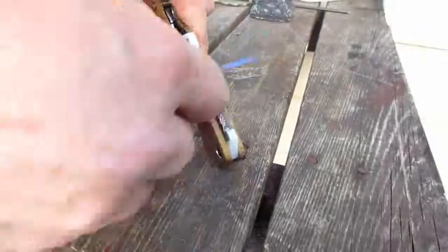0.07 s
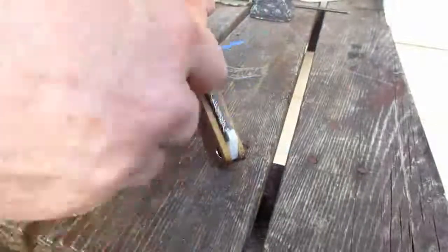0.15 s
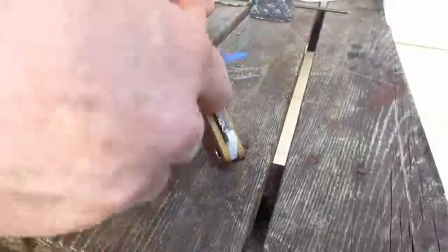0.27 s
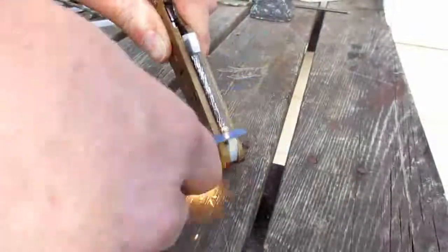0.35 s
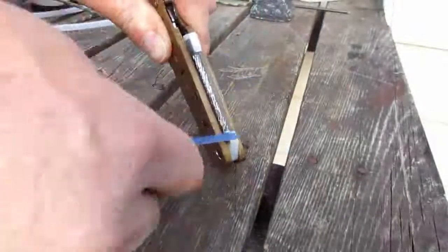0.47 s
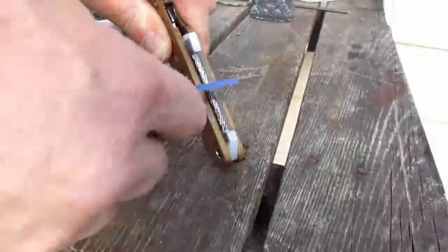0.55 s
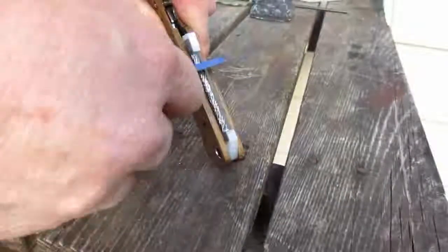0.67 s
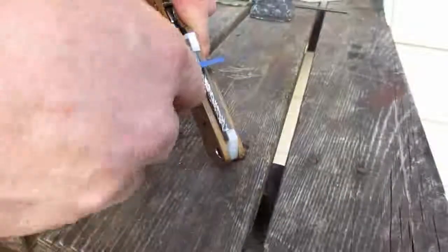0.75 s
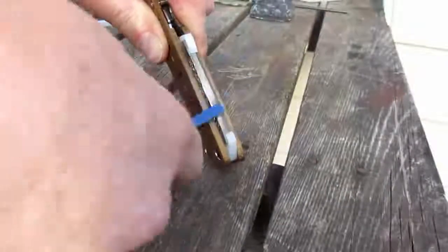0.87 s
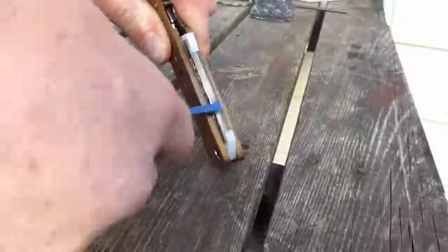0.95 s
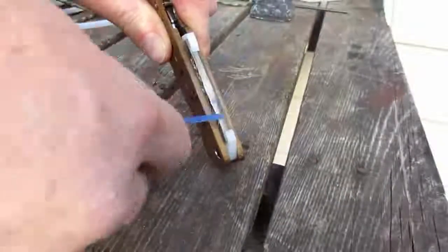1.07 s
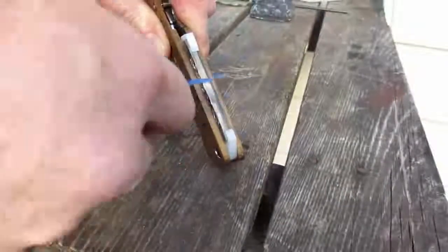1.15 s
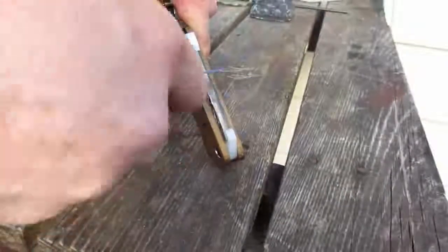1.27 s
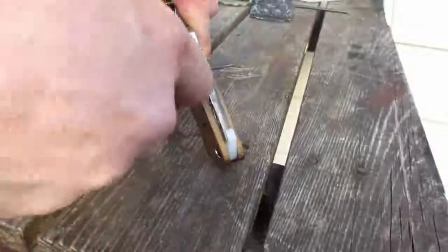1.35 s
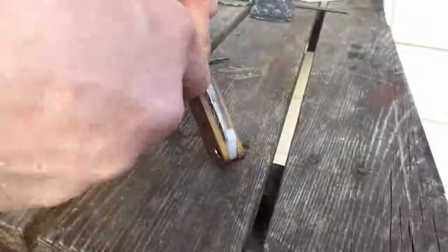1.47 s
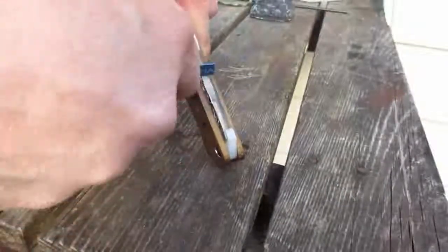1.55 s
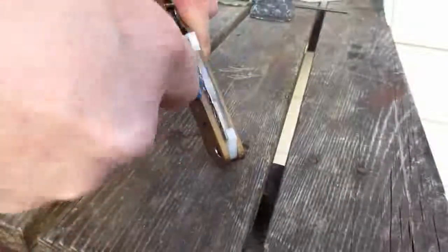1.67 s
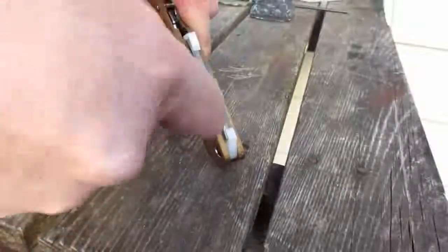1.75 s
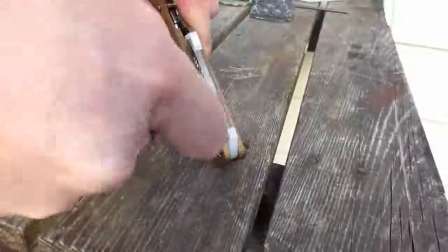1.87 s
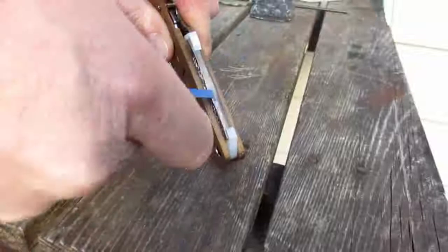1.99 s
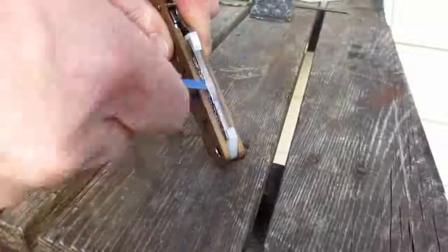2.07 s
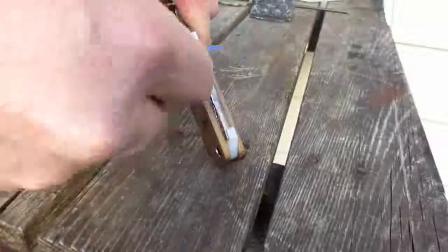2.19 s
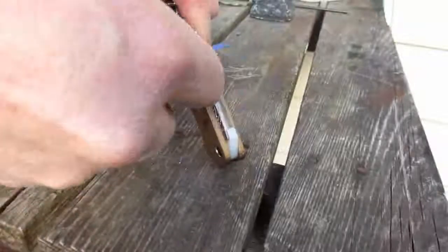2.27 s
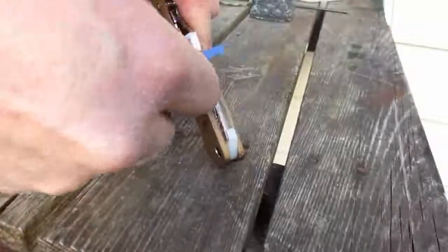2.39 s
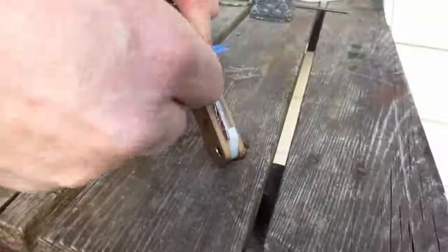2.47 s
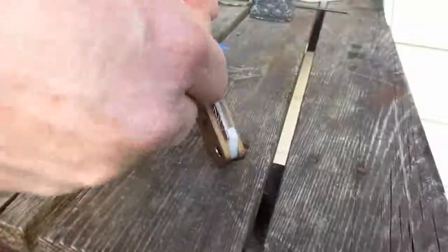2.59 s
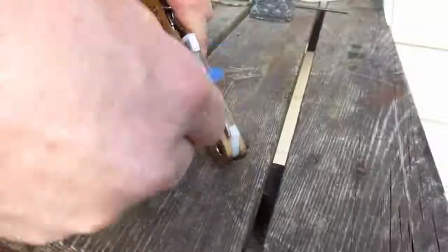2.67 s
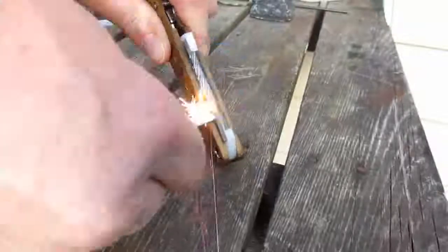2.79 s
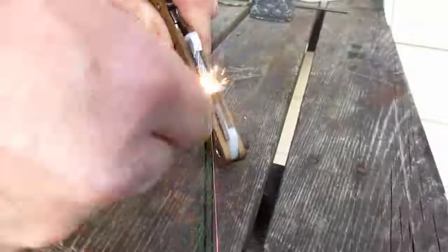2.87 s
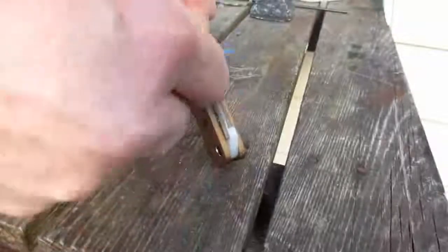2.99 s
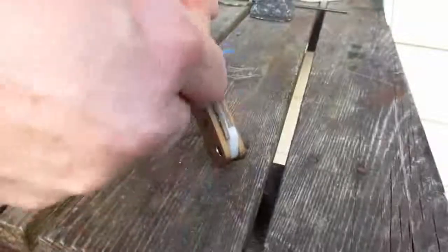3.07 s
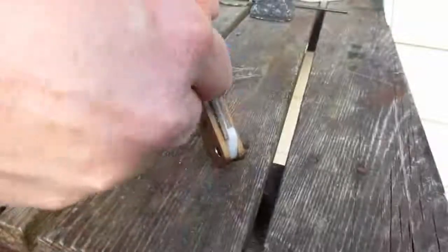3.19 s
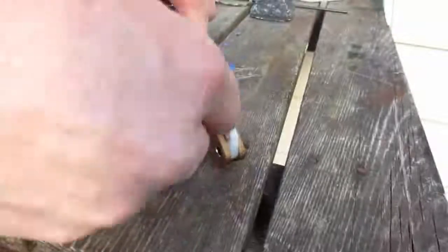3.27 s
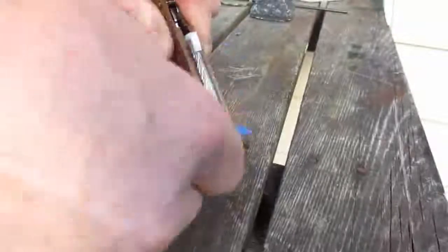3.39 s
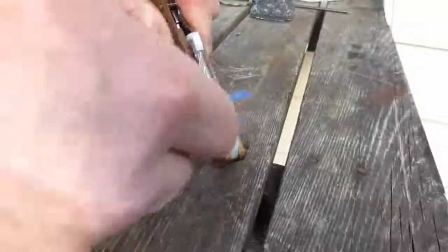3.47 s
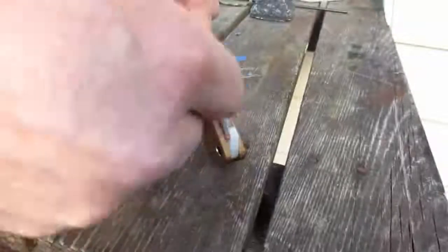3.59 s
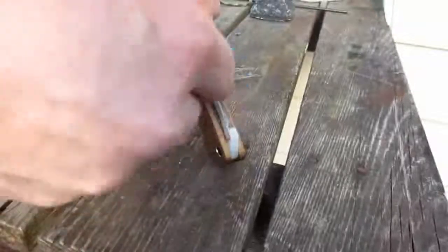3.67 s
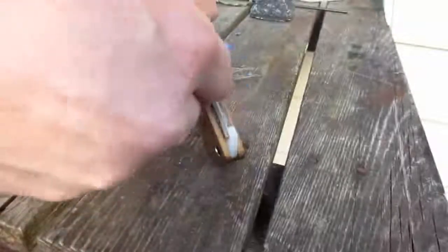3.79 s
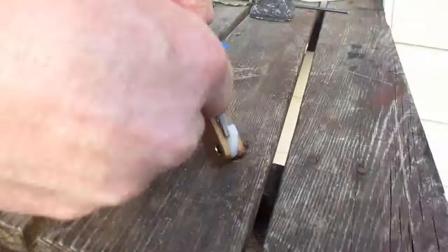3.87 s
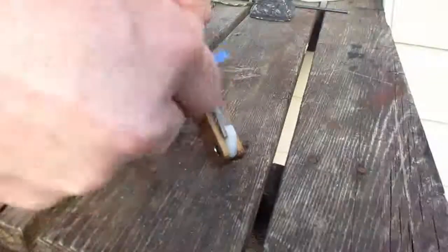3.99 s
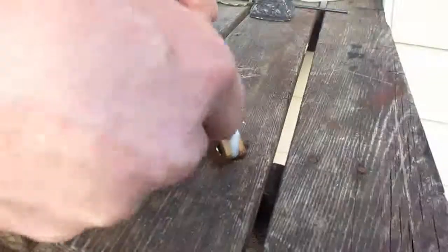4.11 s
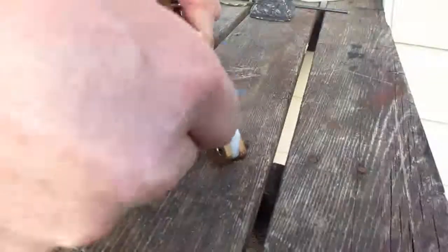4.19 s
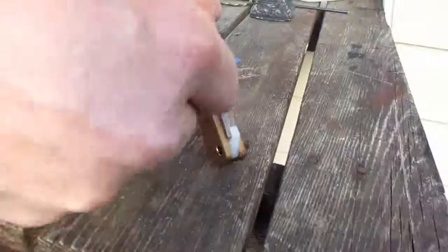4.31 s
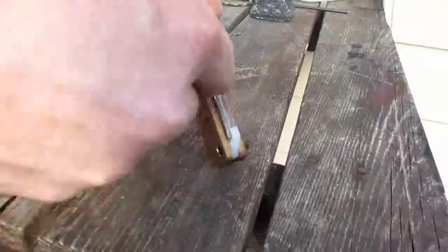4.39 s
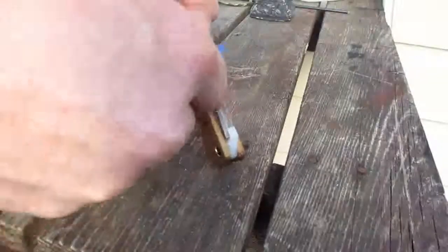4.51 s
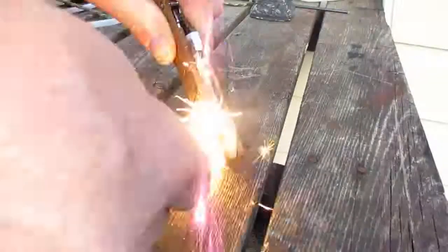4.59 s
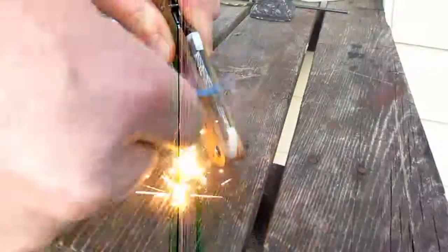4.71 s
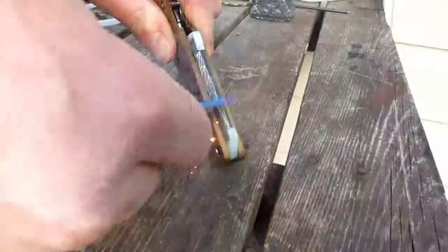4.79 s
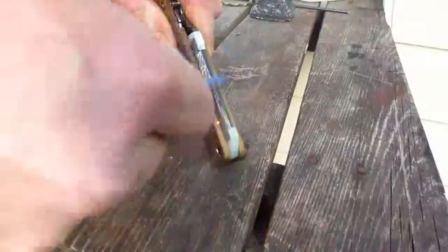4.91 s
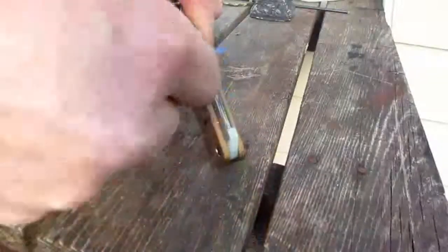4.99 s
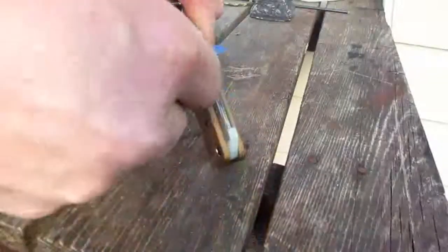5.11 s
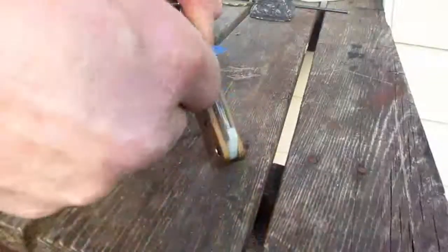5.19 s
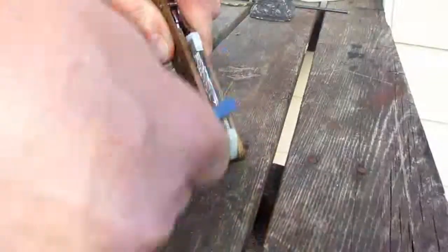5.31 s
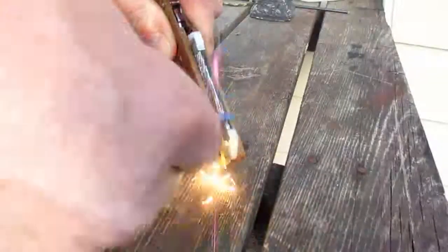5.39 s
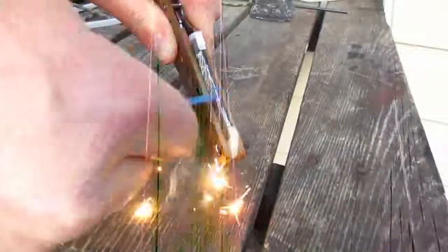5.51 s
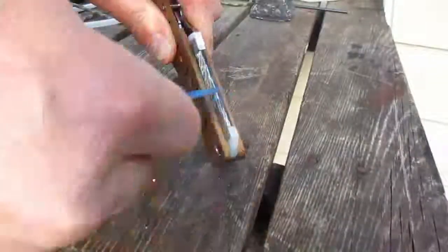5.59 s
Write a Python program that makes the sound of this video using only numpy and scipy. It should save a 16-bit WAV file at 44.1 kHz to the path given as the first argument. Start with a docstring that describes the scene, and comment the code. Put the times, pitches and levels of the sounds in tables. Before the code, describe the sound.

A metal edge catches and slips on flint: a double scratch early, one quick snap, then a sparse stretch of blade ticks and light slides. From the middle, gritty strokes return in clusters, three ending in spark crackle, the last two with loud pops. The table answers with short dull woody knocks. Near, dry, slightly muffled on top, almost centred, over quiet outdoor hum.

```python
"""At a wooden garden table outdoors, a steel striker is scraped along a flint rod held against the boards.
The edge sticks and slips: random clicks coloured as grit also excite the resonant modes of the table.
The harder strokes throw sparks: showers of clicks fizz and short pressure pulses pop.
Between strokes the blade taps (noise bursts and dying modes) and slides lightly back up the rod.
A distant motor hums as wavering sines over the wash of the air, made of shaped noise."""
import sys
import numpy as np
from scipy import signal
from scipy.fft import rfft, irfft
from scipy.io import wavfile
from scipy.ndimage import uniform_filter1d

SR = 44100
rng = np.random.default_rng(int(sys.argv[2]) if len(sys.argv) > 2 else 0)


def master_out(mix):
    """Clip the mix to full scale and print it as 16-bit PCM to the path in sys.argv[1]."""
    frames = np.transpose(np.atleast_2d(mix))
    ceiling = np.clip(frames, -1, 1)
    pcm = np.round(ceiling * 32767).astype(np.int16)
    wavfile.write(sys.argv[1], SR, pcm)


N = 249165

# Levels in the event tables are relative: each source function adds its own trim in dB.
# pushes of the edge down the rod: full_bite_s, hold_s, swell_over_hold_db, edge_bite_db, table_force_db,
# table_tilt_db_per_octave, grit_tilt_db_per_octave, rise_s, fall_s
STROKE_EVENTS = [ (0.318, 0.045, 8, -30.5, -26.5, -0.5, -2, 0.066, 0.022),
                 (0.408, 0.02, -5, -31.5, -32.5, -3, 0.5, 0.027, 0.092),
                 (0.860, 0.015, 3.5, -25, -26, -1.5, -0.95, 0.035, 0.033),
                 (2.681, 0.069, 5, -32.5, -30, -2.2, -2, 0.026, 0.039),
                 (3.294, 0.042, -1, -33.5, -33, -1, -3, 0.045, 0.057),
                 (3.399, 0.051, -11, -45.5, -30.5, -3.5, -3.5, 0.0092, 0.13),
                 (3.891, 0.045, -2.5, -43, -34, -10.5, -5.5, 0.0092, 0.051),
                 (4.028, 0.046, -3.5, -28.5, -22.5, -3, 0, 0.015, 0.045),
                 (4.592, 0.037, -1, -22, -24, -2.2, 0.8, 0.081, 0.047),
                 (5.323, 0.091, -1, -26, -26, -1.1, -0.4, 0.022, 0.0091)]
# showers of burning shavings: full_level_s, hold_s, level_db, fizz_tilt_db_per_octave
SPARK_SHOWERS = [(2.81, 0.085, -28, 0.8), (4.655, 0.091, -26.5, 0.1), (5.436, 0.064, -28, 1.5)]
# modes of the table with the holder on it: pitch_hz, width_hz, level_db
TABLE_MODES = [(103, 56, -7), (265, 31, -6.5), (363, 73, -5), (479, 53, -2), (647, 72, -5), (754, 46.3, 1),
               (885, 110, -7.5), (1007, 131, -4), (1156, 84, -0.5), (1266, 67, -7), (1511, 56, -7.5),
               (1728, 43, -9.5)]
# modes of the loosely held blade: pitch_hz, width_hz, level_db
BLADE_MODES = [(3000, 44, -16), (3750, 400, -9.5), (4850, 190, 3), (4650, 46, -5), (5060, 220, -2),
               (6600, 580, -13)]
# spectrum of the cutting edge: frequency_hz, level_db
GRIT_SPECTRUM = [(100, -21.5), (900, -0.5), (1600, 0), (2100, -7), (2500, -3.5), (3100, -1.5), (3700, -4.5),
                 (4400, -0.5), (5200, -3), (5900, -3), (6500, -4), (6950, 0.5)]
# spectrum of the sliding edge: frequency_hz, level_db
GLIDE_SPECTRUM = [(200, -11.5), (1200, 2), (2200, -1.5), (3000, 4.5), (3800, -1.5), (4900, -1), (6000, 6.5),
                  (7000, -2.5)]

EDGE_HZ = 7085  # upper limit of the sound
RING_T = np.arange(4096) / SR  # time axis of every short sound, s
FADE_DB = 30  # every gesture's rise and fall time spans this much
RISE_BEND = 1.51  # above 1 the edge catches quickly, then eases into its full bite


def amp(db):
    """Level law: 20 dB is a factor of ten in amplitude."""
    return 10 ** (np.asarray(db) / 20)


def evened(x):
    """Normalization to unit root mean square."""
    return x / np.sqrt(np.mean(x ** 2) + 1e-20)


def held(x, steady_s=0.024):
    """Short-term normalization: unit level throughout, with the fast grain kept."""
    power = abs(uniform_filter1d(x ** 2, int(steady_s * SR) + 1))
    return x / np.sqrt(power + 1e-20)


def read(points, hz):
    """Spectral interpolation: straight lines on a log-frequency axis."""
    f, value = np.transpose(points)
    return np.interp(np.log(hz + 1), np.log(f + 1), value)


def add(mix, s, sound):
    """Superposition: adds a sound to the mix from time s, in place."""
    part = mix[max(round(s * SR), 0):][:len(sound)]
    part += sound[:len(part)]


def wander(hz):
    """Slow random modulation: joined chance values of unit level, moving up to hz times a second."""
    knots = rng.standard_normal(N // 20)
    return evened(np.interp(np.arange(N) * 2 * hz / SR, np.arange(N // 20), knots))


def grains(per_s, spread_db):
    """Impulsive excitation: sparse clicks of random sign, most small and a few large."""
    size = amp(spread_db * np.minimum(rng.exponential(1, N), 4))
    return size * rng.choice([-1, 1], N) * (rng.random(N) < per_s / SR)


def colour(points, size=2048):
    """Minimum phase: the causal impulse response with the given spectrum, by folding the cepstrum."""
    cepstrum = irfft(np.log(amp(read(points, np.fft.rfftfreq(size, 1 / SR)))))
    cepstrum[1:size // 2] *= 2
    cepstrum[size // 2 + 1:] = 0
    return irfft(np.exp(rfft(cepstrum)))


def ring(modes):
    """Modal sum: a struck body answers with dying sines, here of alternating sign."""
    response = 0
    for k, (hz, width, db) in enumerate(modes):
        decay = np.exp(-np.pi * width * RING_T)  # a wider resonance dies sooner
        response = response + (-1) ** k * amp(db) * width * decay * np.sin(2 * np.pi * hz * RING_T)
    return response


def through(drive, response):
    """Source-filter principle: a drive convolved with a body's response, held at unit level."""
    return held(signal.oaconvolve(drive, response)[:N])


def control(events, axis, t):
    """Piecewise-linear control: an event column at times t, steady while held, gliding to the next."""
    rows = np.array(events)
    edges = np.column_stack([rows[:, 0], rows[:, 0] + rows[:, 1]]).ravel()
    return np.interp(t, edges, np.repeat(rows[:, axis], 2))


def mottled(x, events, axis, patchy_db, size=4):
    """Time-varying spectrum: tilted event by event, with random patches as each flake breaks differently."""
    hz, t, z = signal.stft(x, SR, nperseg=256)
    patches = uniform_filter1d(rng.standard_normal(z.shape), size, axis=0)
    patches = uniform_filter1d(patches, size, axis=1)
    octaves = np.log2(np.maximum(hz, 500) / 4000)[:, None]  # the tilt stops below 500 Hz
    tilt = octaves * control(events, axis, t)
    return held(signal.istft(z * amp(tilt + patchy_db * evened(patches)), nperseg=256)[1][:N])


def envelope(s, hold_s, swell_db, rise_s, fall_s):
    """Gesture envelope: gain rises until s, swells or sags while held, then falls away exponentially."""
    t = np.arange(N) / SR - s
    rising = (np.maximum(-t, 0) / rise_s) ** RISE_BEND
    falling = np.maximum(t - hold_s, 0) / fall_s
    return amp(swell_db * np.clip(t / hold_s, 0, 1) - FADE_DB * np.minimum(rising + falling, 10))


def background(air_db=-51.5, rumble_db=-3, waver_db=2.4, drift_turns=0.099):
    """Broadband and tonal noise: a distant motor's sines waver in level and phase over outdoor air."""
    # spectrum of the outdoor air: frequency_hz, level_db
    air_spectrum = [(12, -56), (20, -30.5), (45, -3.5), (68, -2), (81, -13), (109, -1.5), (146, -8.5),
                    (238, -3.5), (269, -12.5), (327, -17), (388, -14.5), (428, -18), (752, -18),
                    (1420, -32), (7000, -40.5), (9100, -63), (15400, -120)]
    # lines of the hum: pitch_hz, level_db (root mean square, before wavering)
    hum_lines = [(59.3, -51.5), (119.3, -50.5), (196, -59.5), (215.5, -59.5), (238.6, -51.5), (323, -61.5),
                 (357, -65)]
    t, f = np.arange(N) / SR, np.fft.rfftfreq(N, 1 / SR)
    z = rfft(rng.standard_normal(N)) * amp(read(air_spectrum, f))
    wash = z / irfft(z * ((f > 400) & (f < EDGE_HZ)), N).std()  # unit level above 400 Hz
    rumble = amp(read([(250, rumble_db), (400, 0.0023)], f))
    air = amp(air_db) * irfft(wash * rumble, N)
    hum = 0
    for hz, db in hum_lines:
        level = amp(db + waver_db * wander(4.9))
        hum = hum + level * np.sin(2 * np.pi * (hz * t + drift_turns * wander(4)))
    return air + np.sqrt(2) * hum


def surroundings(x, echo_db=-19, t60=0.1, count=160):
    """Early reflections: faint, short scatter from the hands, the table top and the wall."""
    delay = rng.uniform(0.0041, 0.086, count)  # s
    echoes = np.zeros(SR)
    echoes[(delay * SR).astype(int)] = rng.choice([-1, 1], count) * np.exp(-np.log(1000) * delay / t60)
    return x + amp(echo_db) * signal.oaconvolve(x, echoes / np.linalg.norm(echoes))[:N]


def shower_gain(flare_s=0.027, burn_db_per_s=-88.5, go_out_s=0.042):
    """Burn-down: every shower flares up, sinks at the same speed while held and goes out."""
    return sum(amp(db) * envelope(s, hold, burn_db_per_s * hold, flare_s, go_out_s)
               for s, hold, db, _ in SPARK_SHOWERS)


def sparks(fizz_db=1.0, pop_db=3, pop_s=0.000098):
    """Combustion noise: burning shavings crackle, and flint grains burst with a tiny blast wave."""
    # spectrum of the burning shavings: frequency_hz, level_db
    fizz_spectrum = [(100, -47), (170, -6.5), (255, 1), (327, -2.5), (546, -3), (757, -1.5), (844, -2.5),
                     (1070, 0), (1700, -13), (4060, -11), (4600, -11.5), (7000, -11), (9100, -39.5),
                     (15400, -120)]
    # bursting grains of flint: time_s, peak_db
    pop_events = [(2.8072, -17), (2.8155, -15), (2.897, -17), (4.6066, -2.5), (4.6578, -4), (4.6942, -13),
                  (4.8642, -18), (5.373, -12), (5.438, -2.5), (5.446, -2.5), (5.481, -10)]
    crackle = grains(5000, 2.4) * amp(2.0 * wander(150))
    fizz = mottled(through(crackle, colour(fizz_spectrum)), SPARK_SHOWERS, axis=3, patchy_db=3.5)
    out = amp(fizz_db) * shower_gain() * fizz
    u = RING_T / pop_s
    blast = (1 - u) * np.exp(-u)  # overpressure, then suction
    for s, db in pop_events:
        add(out, s + 0.001075, amp(db + pop_db) * blast)
    return out


def slide_gains(ease=0.51, fall_s=0.037):
    """Common excitation: one touch drives the edge, the table and the ring of the blade."""
    # light slides of the blade: full_level_s, hold_s, swell_over_hold_db, edge_bite_db, table_force_db,
    # blade_ring_db
    slide_events = [ (0.995, 0.029, 4, -46.5, -47, -59), (1.393, 0.0096, -13.5, -56, -34.5, -30.5),
                    (1.47, 0.063, 3.5, -57, -47.5, -53), (1.548, 0.053, -3.5, -40, -37.5, -32),
                    (3.136, 0.015, 3, -52.5, -43, -52), (3.703, 0.025, -2, -58.5, -44, -54.5),
                    (4.155, 0.022, -1.5, -49, -40, -49), (4.869, 0.032, -11.5, -43.5, -43.5, -65)]
    # the rise is a share (ease) of the hold: a long slide starts gently
    return sum(np.outer(amp(levels_db), envelope(s, hold, swell, ease * hold, fall_s))
               for s, hold, swell, *levels_db in slide_events)


def sliding(grit_db=4, blade_db=-4.5, table_db=-2, light_hz=800):
    """Light friction: the blade is free to ring, and mainly the upper table modes answer."""
    bumps = grains(5000, 3.3) * amp(1.4 * wander(180))
    upper = signal.sosfilt(signal.butter(2, light_hz, "high", fs=SR, output="sos"), ring(TABLE_MODES))
    bite, force, ringing = slide_gains()
    edge = amp(grit_db) * bite * through(bumps, colour(GLIDE_SPECTRUM))
    wood = amp(table_db) * force * through(bumps, upper)
    blade = amp(blade_db) * ringing * through(bumps, ring(BLADE_MODES))
    return edge + wood + blade


def taps(knock_db=2, blade_db=-2, scuff_db=-7, crack_s=0.0012, scuff_s=0.0089, rise_s=0.0047,
         focus_db=11, focus_octaves=0.51, damping=0.75, give_s=0.00042):
    """Impact excitation: a contact cracks, rings the blade and scuffs; its place picks the table modes."""
    # the blade lands on the rod or snags in it: time_s, crack_db, crack_tilt_db_per_octave, table_knock_db,
    # blade_ring_db, table_focus_hz
    tap_events = [ (0.170, -31.5, 0, -27, -32, 1040), (0.2933, -41, -7, -26, -41, 1090),
                  (0.3302, -16, 0.5, -16.5, -23, 760), (0.3556, -21, -1, -14.5, -33, 1100),
                  (0.3671, -7.5, 5, -16.5, -44, 750), (0.4558, -24, -4, -22, -43, 1060),
                  (0.6563, -30, 1, -33, -26, 940), (0.809, -38, -5, -36.5, -51, 696),
                  (0.8729, -10.5, 1, -28, -26, 751), (1.0182, -25.5, -1, -38, -42, 787),
                  (1.3028, -37.5, -2, -49, -68, 740), (1.3446, -22, 5.5, -51, -64, 1110),
                  (1.5704, -31, -7, -35, -16.5, 1100), (1.842, -18, 1, -38, -11.5, 1330),
                  (2.2795, -31, 1, -31, -41, 910), (2.4214, -15.5, -2, -19, -45.5, 780),
                  (2.7058, -17, 5, -18, -36, 820), (2.7427, -7, -2, -22, -47, 1200),
                  (2.8046, -13, 4.5, -23.5, -21, 800), (2.8814, -15, -1, -30, -22, 910),
                  (3.0827, -30.5, 1, -42, -36, 1090), (3.2650, -32, -4, -31, -57, 740),
                  (3.4034, -23.5, -5, -26, -45, 738), (3.4356, -31.5, -5, -30, -32, 760),
                  (3.8935, -24, 1, -28, -42, 740), (3.916, -24, -0.5, -26, -42.5, 403),
                  (3.9310, -26, -1, -25, -41, 470), (4.0194, -29.5, 5, -30, -37, 1150),
                  (4.0359, -11, 1.5, -21, -29, 760), (4.0897, -13, 12, -29, -19, 762),
                  (4.4134, -31, -3, -33, -57, 950), (4.5438, -23, -1, -29.5, -23.5, 755),
                  (4.5917, -3, -1.5, -18.5, -30, 794), (4.6580, -14.5, -6, -21, -30, 800),
                  (4.6725, -12.5, -3, -38, -39, 905), (4.7535, -16.5, -3.5, -27.5, -27, 1000),
                  (5.0534, -42, 3, -34, -65, 970), (5.1070, -14, 11, -29, -30, 690),
                  (5.3320, -13.5, -7, -19.5, -38, 570), (5.5635, -29, 4, -45, -61, 930)]
    out = np.zeros(N)
    size = len(RING_T)
    blade = ring(BLADE_MODES) * (1 - np.exp(-RING_T / give_s))  # the fingers give, softening the start
    soft = signal.butter(4, EDGE_HZ, fs=SR, output="sos")
    noises = rng.standard_normal((len(tap_events), 3, size))
    for (s, crack, tilt, knock, steel, hz), noise in zip(tap_events, noises):
        grit = colour([(f, db + tilt * np.log2(f / hz)) for f, db in GRIT_SPECTRUM])
        burst = noise[0] * np.exp(-RING_T / crack_s)  # steel on flint is a very short contact
        snap = signal.fftconvolve(burst, grit)[:size]
        settling = noise[1] * noise[2] ** 2 * np.exp(-RING_T / scuff_s)
        scuff = signal.fftconvolve(settling, colour(GLIDE_SPECTRUM))[:size]
        # modes near the focus pitch are favoured
        wood = ring([(f, damping * width, db + focus_db * np.exp(-(np.log2(f / hz) / focus_octaves) ** 2))
                     for f, width, db in TABLE_MODES])
        wood = wood * (1 - np.exp(-RING_T / rise_s)) ** 2  # the blow takes a moment to spread
        parts = [(signal.sosfilt(soft, snap), crack), (signal.sosfilt(soft, scuff), crack + scuff_db),
                 (wood, knock + knock_db), (blade, steel + blade_db)]
        for sound, db in parts:
            add(out, s + .0006, amp(db) * sound / abs(sound).max())
    return out


def stroke_gains(table_linger=1.7):
    """Common excitation: one push drives edge and table; the boards take longer to fall quiet."""
    bite = force = 0
    for s, hold, swell, bite_db, force_db, _, _, rise, fall in STROKE_EVENTS:
        bite = bite + amp(bite_db) * envelope(s, hold, swell, rise, fall)
        force = force + amp(force_db) * envelope(s, hold, swell, rise, fall * table_linger)
    return bite, force


def scraping(chatter_hz=150, chatter_db=1.5, grit_db=4, shift_db=2, thud_db=2.0, lowest_hz=122):
    """Stick-slip friction: the edge breaks off flint in clumps, and the same jolts shake the table."""
    chips = grains(7000, 2.8) * amp(chatter_db * wander(chatter_hz))
    grit = mottled(through(chips, colour(GRIT_SPECTRUM)), STROKE_EVENTS, axis=6, patchy_db=2.0)
    tilt = control(STROKE_EVENTS, axis=5, t=np.arange(N) / SR)
    wood = 0
    for k, mode in enumerate(TABLE_MODES):
        slope = tilt - thud_db * (mode[0] < 300)  # the lowest modes are lifted
        # as the contact travels along the rod it feeds now one table mode, now another
        level = amp(slope * np.log2(mode[0] / 800) + shift_db * wander(14))
        wood = wood + signal.oaconvolve(chips, ring([mode]))[:N] * (-1) ** k * level
    # the table's answer carries no deep bass
    wood = signal.sosfilt(signal.butter(4, lowest_hz, "high", fs=SR, output="sos"), wood)
    bite, force = stroke_gains()
    return amp(grit_db) * bite * grit + force * held(wood)


def scene():
    """Superposition and level panning: all is close to the centre, the low sounds lean to the right."""
    # the hum and the air sink at the end: time_s, level_db
    swell_points = [(0, -0.5), (5.33, 0.5), (5.5, -2.5), (5.65, -3.5)]
    # stereo balance: frequency_hz, left_minus_right_db
    lean_points = [(1000, -3), (1400, -2.3), (2000, -0.5), (3000, 0)]
    swell = amp(np.interp(np.arange(N) / SR, *np.transpose(swell_points)))
    mono = surroundings(scraping() + sliding() + taps() + sparks()) + swell * background()
    lean = read(lean_points, np.fft.rfftfreq(N, 1 / SR))
    return irfft(rfft(mono) * amp([lean / 2, -lean / 2]), N)


def record(dry):
    """Band limiting: a steep linear-phase low-pass filter."""
    lowpass = signal.firwin(1023, EDGE_HZ, window=("kaiser", 9), fs=SR)
    return signal.oaconvolve(dry, lowpass[None], "same")


dry = scene()
out = record(dry)
master_out(out)
```